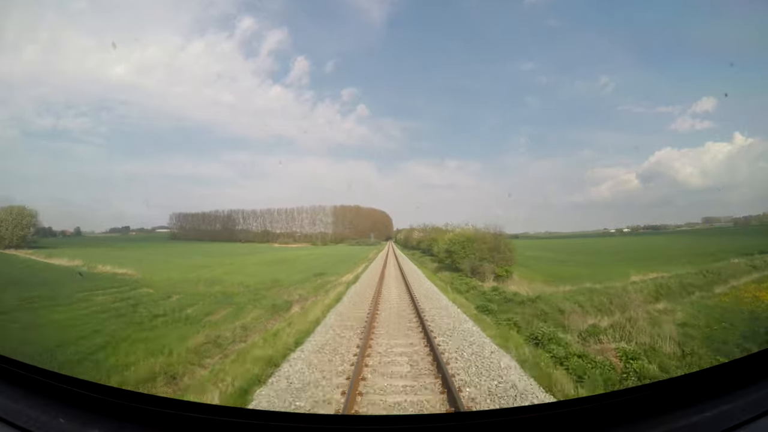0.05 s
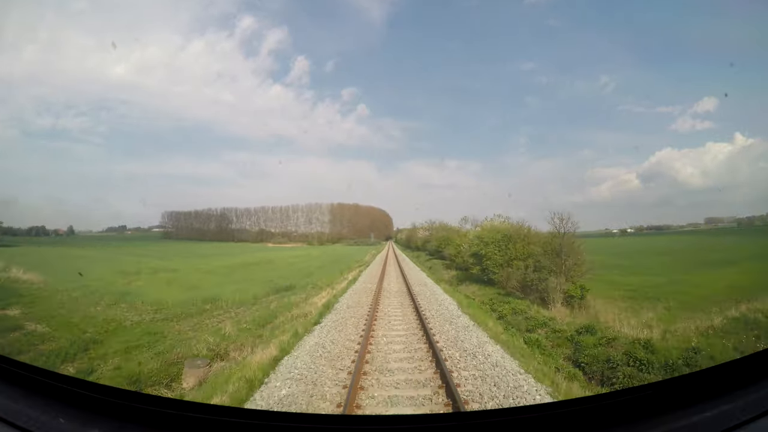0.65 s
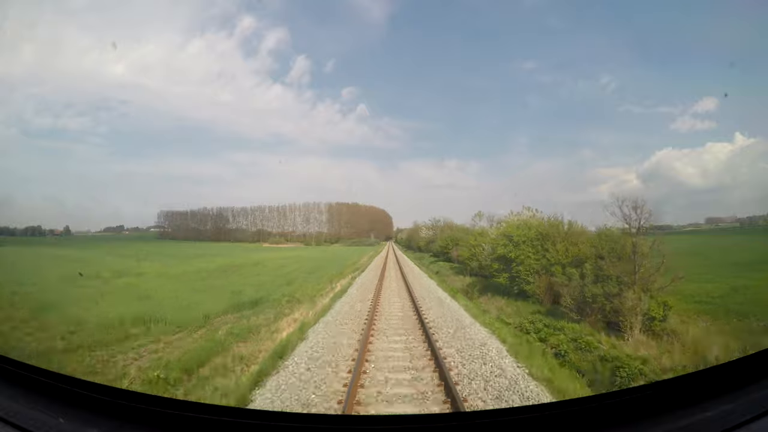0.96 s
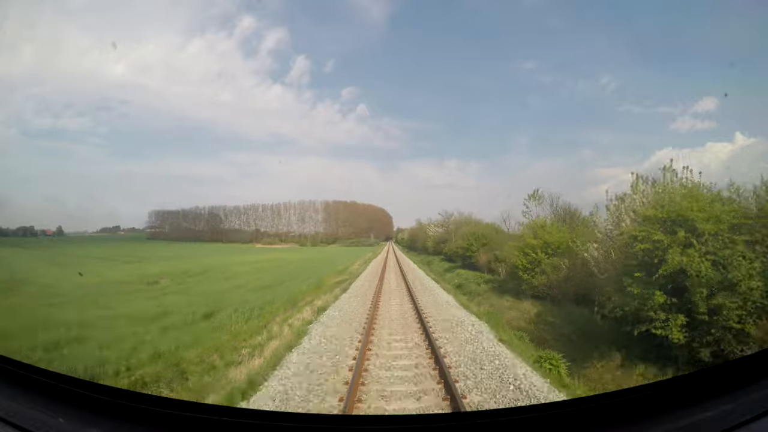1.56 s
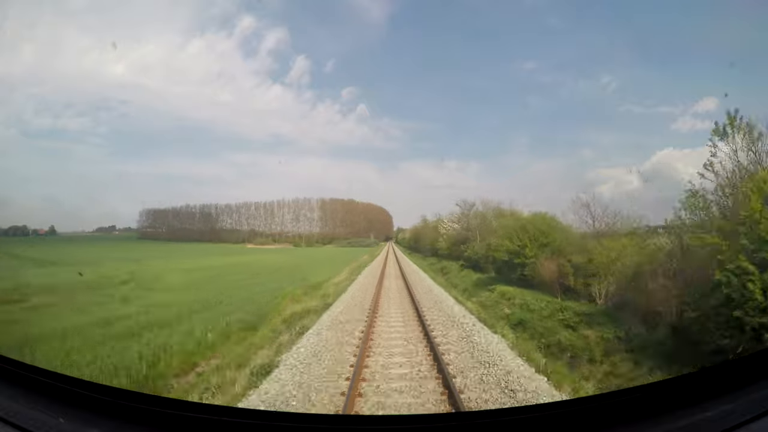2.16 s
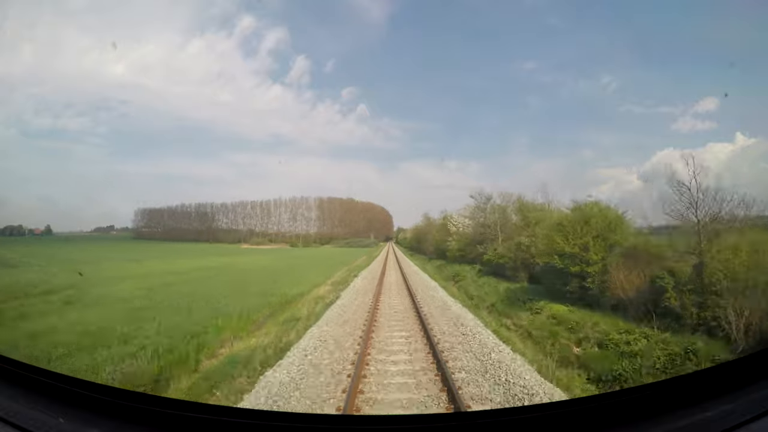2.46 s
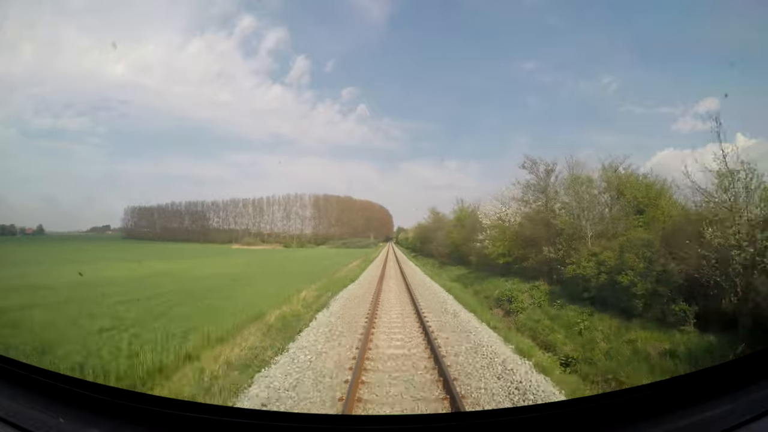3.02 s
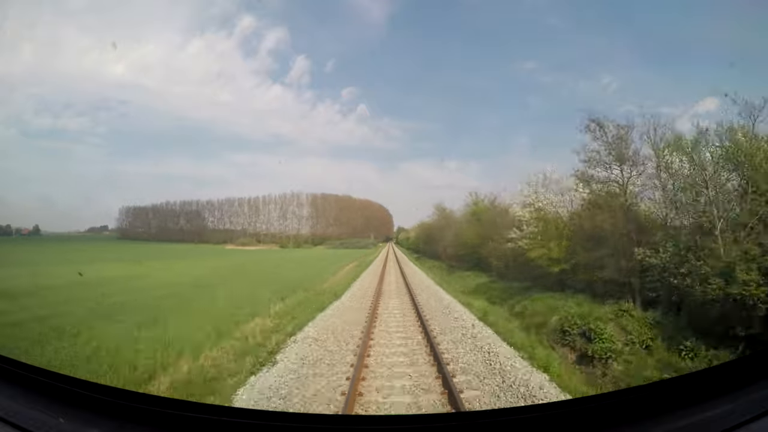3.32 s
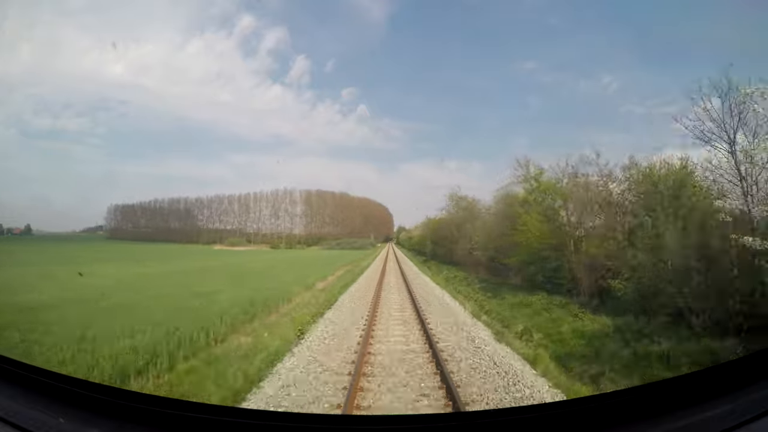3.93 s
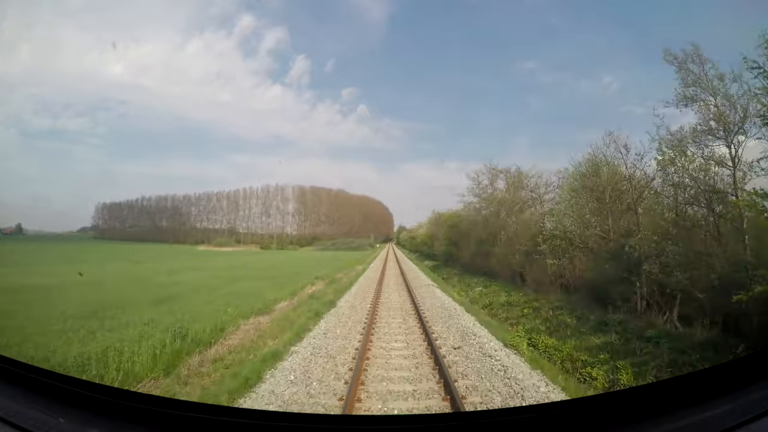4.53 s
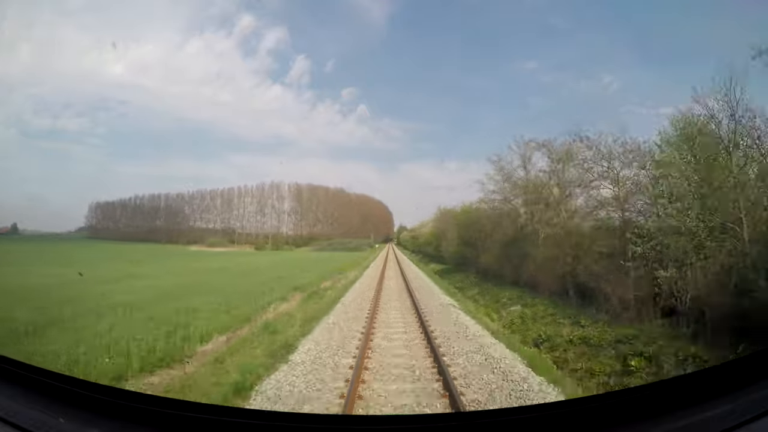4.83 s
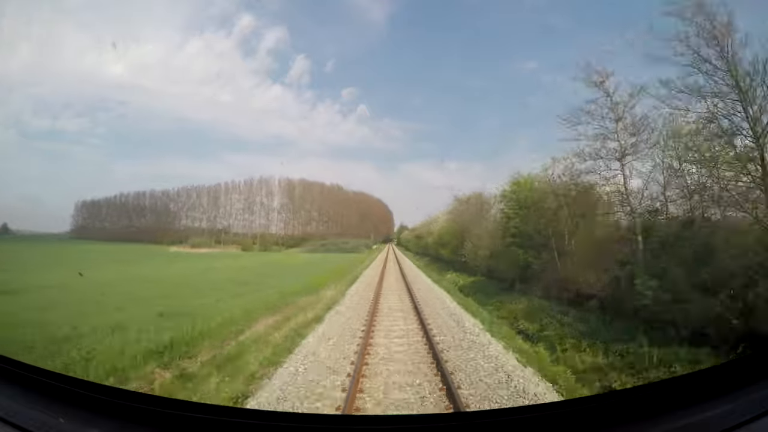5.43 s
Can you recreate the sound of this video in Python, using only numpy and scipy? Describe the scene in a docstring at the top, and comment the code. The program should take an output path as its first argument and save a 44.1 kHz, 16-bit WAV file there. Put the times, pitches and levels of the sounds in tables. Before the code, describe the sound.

A diesel railcar runs at steady speed, heard from inside the driver's cab with the microphone close to the panels. Throughout the nearly six seconds there is a loud, deep rumble: the body booms, the wheels roar, the engines drone and a fan hum throbs against the beat of the sleepers. A softer hiss of rails and air and a faint wheel whine sit above it, growing slightly from about 2 seconds as a hedge reflects the sound. Loose fittings chatter lightly around 0.5 seconds, followed by a small ringing knock at 0.6 and a short grainy creak at 0.8. A brief rattle comes at 2.1 seconds. Around 2.6 the wheels jolt once with a low thud. More quick rattles and ticks come at 4.7, 5.2 and 5.6 seconds, while the rumble carries on unchanged.

```python
"""Inside the driver's cab of a diesel railcar at steady speed, one microphone, close to the panels.
Underfoot the track shakes the car body into a boom, the wheels roar and ring on the rails, and two
engines drone through the floor; the beat of the sleepers throbs against the hum of a fan.
Outside, rails and air hiss, louder where a hedge throws the sound back. The bogie jolts once;
close by, loose fittings chatter now and then, with knocks, ringing ticks and one short grainy creak."""
import sys
import numpy as np
from scipy import signal
from scipy.fft import rfft, irfft
from scipy.io import wavfile
from scipy.ndimage import uniform_filter1d

SR = 44100
rng = np.random.default_rng(int(sys.argv[2]) if len(sys.argv) > 2 else 0)


def wav_out(sig):
    """Save sig, one row per channel (or a flat mono array), as 16-bit PCM at SR to the path in sys.argv[1]."""
    wavfile.write(sys.argv[1], SR, np.round(np.clip(np.atleast_2d(sig).T, -1, 1) * 32767).astype(np.int16))


N = 250488
T, HZ = np.arange(N) / SR, np.arange(N // 2 + 1) * SR / N

# Spectra give relative levels; a ride is a level curve that counts only about its own average.
# car body, shaken by the track: f/Hz, level/dB
BODY_SPECTRUM = [(4, -36), (10, -11), (19, 5.5), (30, 3), (42, 3), (55, 0.5), (72, -13), (115, -11),
                 (140, -17), (165, -17.5), (188, -13.5), (225, -23), (310, -54), (530, -100)]
# floor resonances: f/Hz, width/Hz, lift/dB
FLOOR_MODES = [(19, 15, 4), (59, 3.9, 4.4), (137, 25, 5.4), (195, 6.2, 1.1)]
# drumming of the floor: t/s, level/dB
DRUM_RIDE = [(0, -22), (0.9, -22), (1.3, -19.5), (2, -22.0), (2.9, -20.5), (3.4, -24), (3.8, -21.5),
             (4.2, -22.5), (5.1, -19.5), (5.68, -22.5)]
# rolling noise: f/Hz, level/dB
ROLLING_SPECTRUM = [(130, -38.5), (225, -7), (290, -1), (370, -1.5), (440, -4), (480, -10), (550, -16.5),
                    (660, -19.5), (700, -24), (950, -27), (1150, -30.5), (1500, -30.5), (1900, -38.5),
                    (4000, -100)]
# wheel and panel resonances: f/Hz, width/Hz, lift/dB
ROLLING_MODES = [(420, 32, 3), (593, 12, 4), (631.5, 8.9, 3), (738, 12, 3.5), (783, 11, 3), (818, 20, 2),
                 (900, 9.3, -2.5), (933, 74, 3), (1318, 16, 7.5), (1346, 24, 5), (1422, 32, 3.5)]
# roughness of the rails: t/s, level/dB
ROUGHNESS_RIDE = [(0, -24), (0.5, -24), (1.05, -23.5), (2, -25), (3.2, -21), (3.55, -24.5), (4.05, -21.5),
                  (4.7, -22.5), (5, -22.5), (5.4, -23.5), (5.68, -23)]
# track noise, rising as the hedge comes alongside and throws it back: t/s, level/dB
HEDGE_RIDE = [(0, -43.5), (0.45, -42.5), (1.3, -42.5), (1.75, -42), (2.05, -40.5), (2.7, -40), (3.1, -40.5),
              (3.55, -41.5), (4, -38.5), (4.5, -40.5), (5, -40), (5.68, -39.5)]
# fan hum: multiple of fan speed, level/dB
FAN_HARMONICS = [(1, -25.5), (2, -40), (4, -41)]
# crankshaft speed: t/s, f/Hz
SHAFT_SPEED = [(0, 22.37), (1.5, 22.33), (3, 22.39), (4.3, 22.35), (5.68, 22.31)]
# engine drone, six cylinders firing on every third order: multiple of shaft speed, level/dB
ENGINE_ORDERS = [(2, -32.5), (3, -38), (4, -35.5), (5, -42), (6, -42), (9, -43.5), (15, -33), (18, -40),
                 (30, -54.5)]
# the order at which the cab resonates: t/s, level/dB
CAB_ORDER_RIDE = [(0, -30.5), (.45, -27.5), (0.8, -31.5), (1.3, -29), (1.8, -35), (2.3, -30.5), (3, -30),
                  (3.55, -32), (4.05, -23.5), (4.5, -27), (5.05, -27), (5.68, -23)]
# a bump shakes the bogie, then the body thuds: t/s, level/dB, half length/s, f/Hz, glide/(octaves/s)
BOGIE_JOLT = [(2.565, -25, 0.014, 195, 1), (2.578, -20, 0.032, 62, 10), (2.638, -17.5, 0.021, 97.7, 5),
              (2.64, -22, .018, 135, 3.5), (2.695, -13, 0.018, 44.5, -0.5)]
# the roar swells briefly near 300 and 400 Hz: t/s, level/dB, half length/s, f/Hz, glide/(octaves/s)
ROAR_SWELLS = [(.19, -23.5, 0.027, 288, -0.98), (.49, -27, 0.047, 402, 0.029), (.88, -28, .035, 300, -1.3),
               (1.08, -27, 0.045, 287.3, 0.87), (1.62, -29, 0.064, 302, -1.05),
               (4.05, -24.5, 0.018, 398, 0.22), (4.32, -26, 0.021, 293, 0), (4.97, -25, 0.037, 396.6, .5)]
# knocks, ringing ticks and a grainy creak at 0.80-0.85 s: t/s, level/dB, decay/s, f/Hz, width/Hz
KNOCKS_AND_CREAK = [(.465, -57, .03, 5560, 2000), (.615, -39, .009, 1580, 800),
                    (.616, -50, .008, 6070, 1600), (.616, -58, .01, 12500, 4500),
                    (0.618, -40, 0.013, 2900, 300), (.792, -59, .009, 9600, 1000),
                    (.802, -39, 0.013, 1220, 248), (.812, -37, .035, 1950, 1110),
                    (.83, -36.5, 0.015, 1710, 910), (.837, -38, .009, 2500, 1000),
                    (.85, -39.5, 0.026, 2000, 700), (2.068, -42, .007, 6240, 1200),
                    (2.069, -40, .014, 2960, 1400), (4.701, -37, .018, 2540, 1000),
                    (5.203, -38, 0.014, 2170, 600), (5.222, -43, .01, 2170, 700)]
# chatter of loose fittings: t/s, level/dB, rise/s, decay/s, tilt/(dB/octave)
FITTING_RATTLES = [(.14, -64, .04, 0.027, 7), (.465, -48, 0.0092, 0.029, -3.5),
                   (.495, -52, 0.0053, 0.021, 1), (.616, -45, 0.0018, 0.011, 0),
                   (.793, -52.5, .004, 0.038, 3), (.893, -60, .008, .015, 5),
                   (2.065, -39, 0.0084, 0.038, -1.5), (2.333, -53, 0.0098, 0.016, 3),
                   (2.65, -52, 0.03, .03, 0), (4.699, -40.5, 0.016, 0.029, -2.5),
                   (5.207, -43, 0.006, 0.03, 0.5), (5.625, -45, 0.012, 0.017, -3.5)]
# ring of the fittings: f/Hz, level/dB
FITTING_SPECTRUM = [(700, -28.5), (1400, 3.5), (2200, 9), (3200, -3.5), (4800, 3.5), (6500, -3),
                    (7800, -9.5), (10000, -13.5), (13000, -13.5), (15500, -20)]
# their resonances: f/Hz, width/Hz, lift/dB
FITTING_RESONANCES = [(2170, 270, 2), (2900, 150, 3), (4300, 900, 2.4), (5770, 180, 3.2), (6600, 220, 5.6),
                      (9700, 600, 3)]
# hiss of rails and air: f/Hz, level/dB
HISS_SPECTRUM = [(1000, -36.5), (1700, -16.5), (2000, -6.5), (2670, -3.5), (2900, -4.5), (3420, -13.5),
                 (4500, -19), (5000, -22), (6320, -27), (7270, -35.5), (9400, -47), (16000, -77)]
# resonances in that hiss: f/Hz, width/Hz, lift/dB
RAIL_MODES = [(2015, 58, 1.2), (2597, 32, 6), (2690, 40, 1.7), (2880, 150, 1.2), (4550, 530, 2.4),
              (5450, 250, 2.2), (6370, 270, 3.2)]
# trembling trim: f/Hz, level/dB
TRIM_SPECTRUM = [(3000, -32), (6500, -3.5), (8000, -2), (10000, 0), (12000, -3.5), (14000, -3.5),
                 (15500, -10.5)]


def car_body(bounce_db=-16.5, boom_db=-27.5, drum_db=-25.0, steadiness=0.65):
    """All round the microphone the car bounces on its springs, booms in its shell, drums in its floor."""
    shake = noise(shape(BODY_SPECTRUM, FLOOR_MODES))
    bounce = held(band(shake, 5, 38.2), steadiness) * gain_of(bounce_db)
    boom = held(band(shake, 36, 59.7), steadiness) * gain_of(boom_db)
    drum = band(shake, 58.5, 400) * gain_of(drum_db + swell(DRUM_RIDE))
    return bounce + boom + drum


def wheels(level_db=-24.0, flutter_db=0.15):
    """Below the cab, rough rails shake wheels and floor into a roar; the hedge returns the ringing."""
    rolling = noise(shape(ROLLING_SPECTRUM, ROLLING_MODES))
    roughness = swell(ROUGHNESS_RIDE)
    ring = above(rolling, edge_hz=650)
    roar = held(rolling - ring, steadiness=0.25) * gain_of(0.82 * roughness)
    ring = ring * gain_of(0.33 * roughness + 0.35 * swell(HEDGE_RIDE))
    return (roar + ring) * gain_of(level_db + flutter_db * wander(rate_hz=22))


def sleepers_and_fan(speed_m_per_s=28.77, gap_m=.6, sleeper_db=-26.5, fan_hz=50.4, in_step_s=.18):
    """The wheels cross the sleepers just below the rate of the cooling fan's hum, so the two throb."""
    since, start = T - in_step_s, rng.random()
    sleepers = tone(start + speed_m_per_s / gap_m * since, sleeper_db - 0.5 * wander(rate_hz=3))
    fan = sum(tone(order * (start + fan_hz * since), db) for order, db in FAN_HARMONICS)
    return sleepers + fan


def engines(cab_order=15, twin_ahead_hz=.067, twin_db=-12.0, in_step_s=0.22):
    """Shaft orders waver through the swaying body; a slightly faster twin engine beats with one."""
    turns = np.cumsum(curve(SHAFT_SPEED)) / SR
    drone = np.zeros(N)
    for order, db in ENGINE_ORDERS:
        phase = order * turns + rng.random() + .04 * wander(rate_hz=13)
        level = db + 1.5 * wander(rate_hz=7.5)
        if order == cab_order:  # the cab resonates here: more flutter in level and pitch
            level = level + swell(CAB_ORDER_RIDE) + 2 * wander(rate_hz=8)
            phase = phase + .07 * wander(rate_hz=8)
            twin_lead = order * twin_ahead_hz * (T - in_step_s)
            drone += tone(phase + twin_lead, level + twin_db)
        drone += tone(phase, level)
    return drone


def low_swells(rows, slip_turns=.06):
    """Short swells of low tone, each gliding a little unevenly in pitch."""
    out = np.zeros(N)
    for peak_s, db, half_length, hz, glide in rows:
        since = np.clip(T - peak_s, -.2, .2)
        pitch = hz * 2 ** (glide * since)
        turns = np.cumsum(pitch) / SR + rng.random() + slip_turns * wander(rate_hz=24)
        out += tone(turns, db) * np.exp(-((T - peak_s) / half_length) ** 2 / 2)
    return out


def knocks_and_creak(rise_s=0.0014):
    """Close by, sharp bursts die away in one resonance each: knocks, ticks and, bunched, a creak."""
    out = np.zeros(N)
    for peak_s, db, decay, centre, width in KNOCKS_AND_CREAK:
        ring = noise(resonance(centre, width, steepness=6))
        out += ring * gain_of(db) * burst(peak_s, rise_s, decay)
    return out


def fitting_rattles(contacts_per_s=500, contact_share=0.33):
    """A loose fitting buzzes up and dies away: tiny contacts blurred by the small cab."""
    out, ring = np.zeros(N), shape(FITTING_SPECTRUM, FITTING_RESONANCES)
    octaves = np.log2(np.maximum(HZ, 1000) / 5000)
    for peak_s, db, rise, decay, tilt in FITTING_RATTLES:
        contacts = unit_rms(rng.choice([-1, 1], N) * (rng.random(N) < contacts_per_s / SR))
        blur = rng.standard_normal(N)
        drive = np.sqrt(contact_share) * contacts + np.sqrt(1 - contact_share) * blur
        out += gain_of(db) * burst(peak_s, rise, decay) * colour(drive, ring + tilt * octaves)
    return out


def rail_hiss(level_db=-43.0, gust_db=0.35):
    """Rails and air hiss outside; the top is gustier and brightens beside the hedge."""
    hiss, hedge = noise(shape(HISS_SPECTRUM, RAIL_MODES)), swell(HEDGE_RIDE)
    top = above(hiss, edge_hz=3000)
    top_lift_db = 1.0 + 0.17 * hedge + 0.5 * wander(rate_hz=7.6)
    hiss = hiss - top + top * gain_of(top_lift_db)
    return hiss * gain_of(level_db + hedge + gust_db * wander(rate_hz=22))


def wheel_whine(level_db=-53.0):
    """One wheel mode sings out, the more so the closer the hedge."""
    ring = noise(resonance(centre_hz=953, width_hz=60, steepness=4))
    return ring * gain_of(level_db + 1.8 * swell(HEDGE_RIDE))


def trim_fizz(level_db=-69.5, tremble_db=1.0, ticks_per_s=150, tick_db=-11):
    """Faint behind it all, the trim trembles: a thin hiss with tiny ticks in it."""
    ticks = unit_rms(rng.standard_normal(N) * (rng.random(N) < ticks_per_s / SR))
    fizz = colour(rng.standard_normal(N) + gain_of(tick_db) * ticks, shape(TRIM_SPECTRUM))
    return fizz * gain_of(level_db + .3 * swell(HEDGE_RIDE) + tremble_db * wander(rate_hz=45))


def gain_of(db):
    """Decibels to amplitude."""
    return 10 ** (np.asarray(db) / 20)


def unit_rms(x):
    """Scales to an rms of one."""
    return x / np.sqrt(np.mean(x ** 2) + 1e-20)


def curve(rows):
    """Joins (t/s, value) rows by straight lines."""
    return np.interp(T, *np.transpose(rows))


def swell(ride):
    """How far a ride stands above its own average, in dB."""
    level = curve(ride)
    return level - level.mean()


def burst(peak_s, rise_s, decay_s):
    """An envelope that rises to one and falls, both exponentially."""
    return np.exp(-np.maximum((peak_s - T) / rise_s, (T - peak_s) / decay_s))


def tone(turns, db):
    """A sine of the given rms level that follows a count of turns."""
    return gain_of(db) * np.sqrt(2) * np.cos(2 * np.pi * turns)


def shape(points, modes=()):
    """A spectrum in dB: points joined on a log axis, lifted at each resonance."""
    hz, db = np.transpose(points)
    lifts = sum(lift / (1 + (2 * (HZ - centre) / width) ** 2) for centre, width, lift in modes)
    return np.interp(np.log(HZ + 1), np.log(hz + 1), db) + lifts


def resonance(centre_hz, width_hz, steepness):
    """One flat-topped peak, as a spectrum in dB."""
    return -10 * np.log10(1 + (2 * (HZ - centre_hz) / width_hz) ** steepness)


def colour(x, db):
    """Filters x by a spectrum in dB, at unit level."""
    return unit_rms(irfft(rfft(x) * gain_of(db), N))


def noise(db):
    """Random vibration with the given spectrum, at unit level."""
    return colour(rng.standard_normal(N), db)


def wander(rate_hz):
    """Slow random drift of unit size."""
    return unit_rms(irfft(rfft(rng.standard_normal(N)) * np.exp(-(HZ / rate_hz) ** 2), N))


def band(x, low_hz, high_hz):
    """The part of x between two soft edges, at unit level."""
    return colour(x, -20 * np.log10((1 + (low_hz / (HZ + .01)) ** 12) * (1 + (HZ / high_hz) ** 12)))


def above(x, edge_hz):
    """The part of x over a soft edge, at its own level."""
    return irfft(rfft(x) * (1 - 1 / (1 + (HZ / edge_hz) ** 8)), N)


def held(x, steadiness):
    """Evens out the level, as a heavy mode holds its swing over several cycles."""
    swing = np.sqrt(abs(uniform_filter1d(x ** 2, size=5000)) + 1e-9)
    return unit_rms(x / swing ** steadiness)


def scene():
    """Everything that reaches the microphone in the cab, in mono."""
    rumble = engines() + sleepers_and_fan() + car_body() + wheels()
    background = wheel_whine() + rail_hiss() + trim_fizz()
    swells = low_swells(BOGIE_JOLT) + low_swells(ROAR_SWELLS)
    return (rumble + background + swells + knocks_and_creak() + fitting_rattles())[None]


def record(dry, ceiling=.9, cutoff_hz=15300):
    """The very highest peaks are rounded off gently, then the recorder limits the band."""
    rounded = dry / (1 + (dry / ceiling) ** 16) ** (1 / 16)
    lowpass = signal.firwin(511, cutoff_hz, window=("kaiser", 9), fs=SR)
    return signal.oaconvolve(rounded, lowpass[None], "same")


dry = scene()
out = record(dry)
wav_out(out)
```